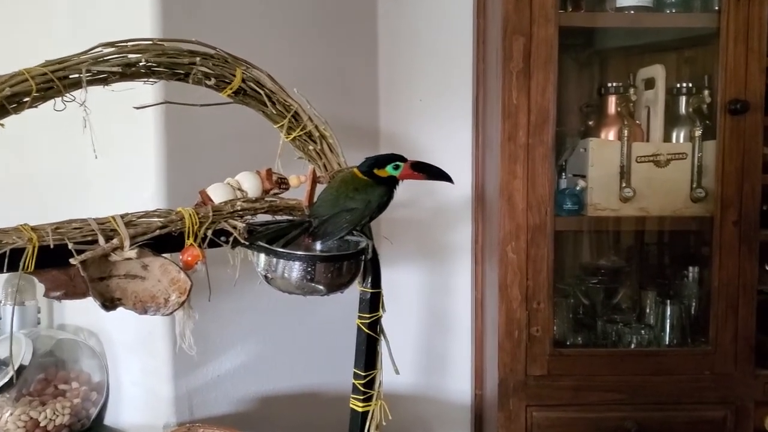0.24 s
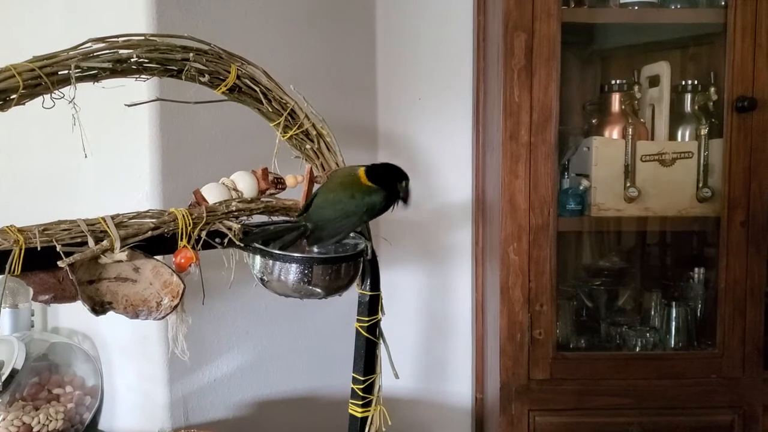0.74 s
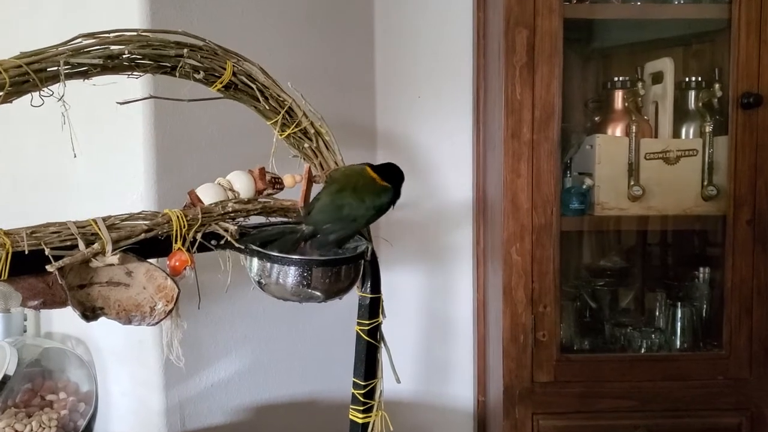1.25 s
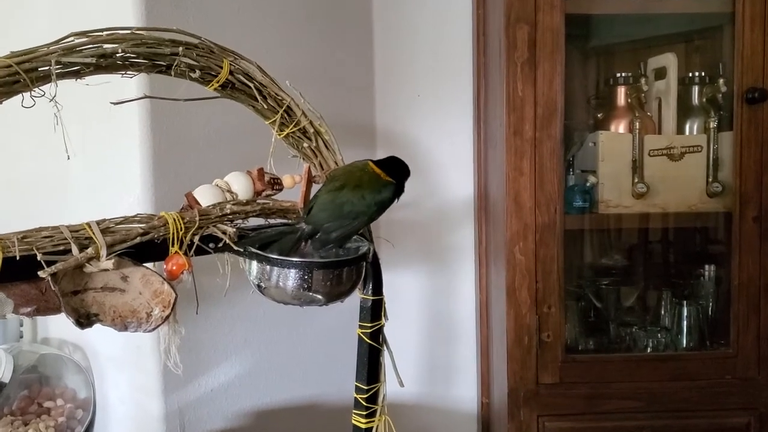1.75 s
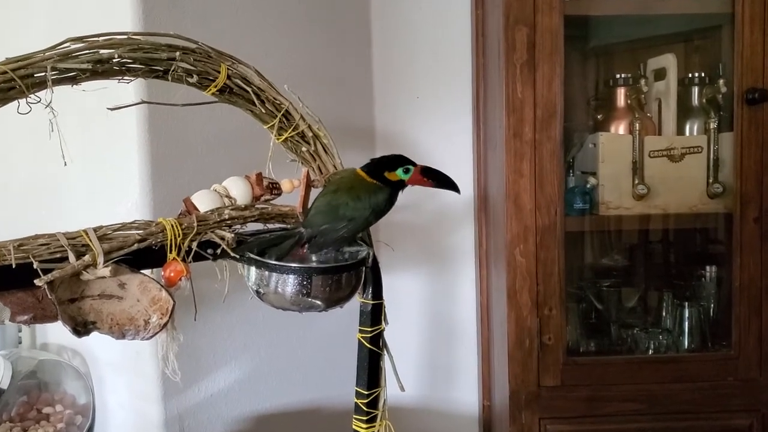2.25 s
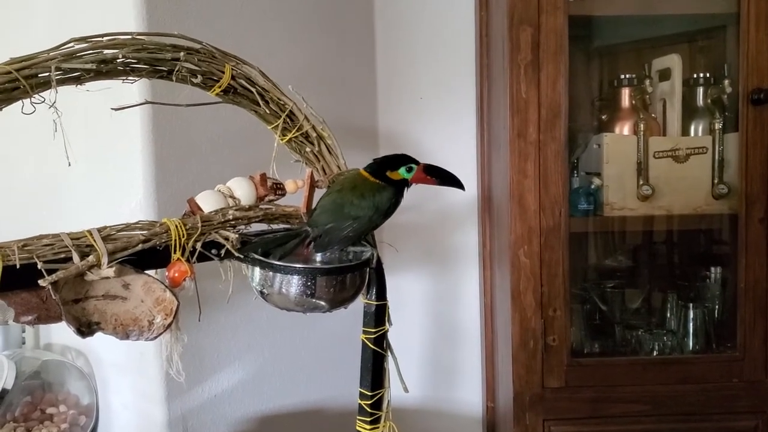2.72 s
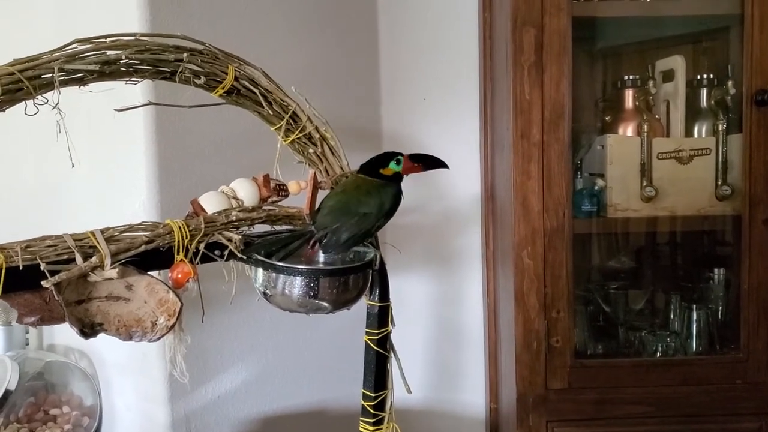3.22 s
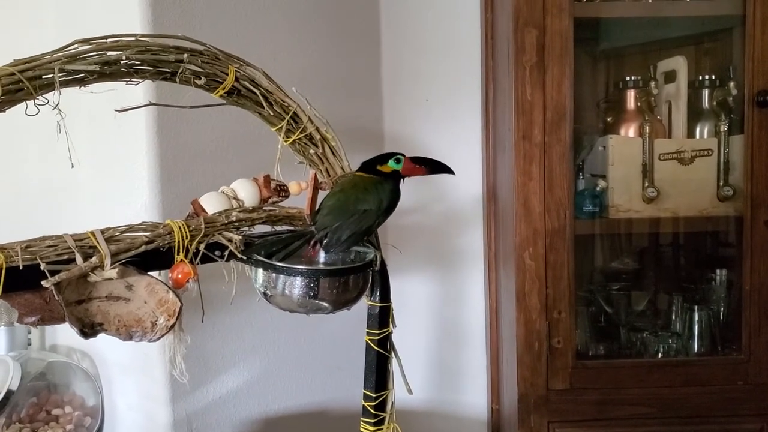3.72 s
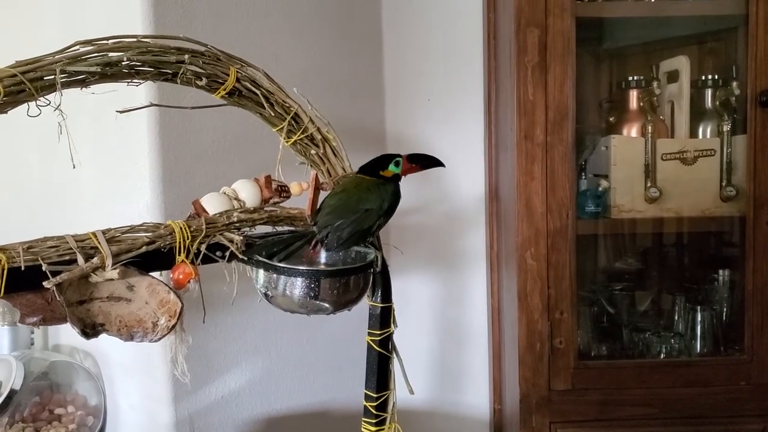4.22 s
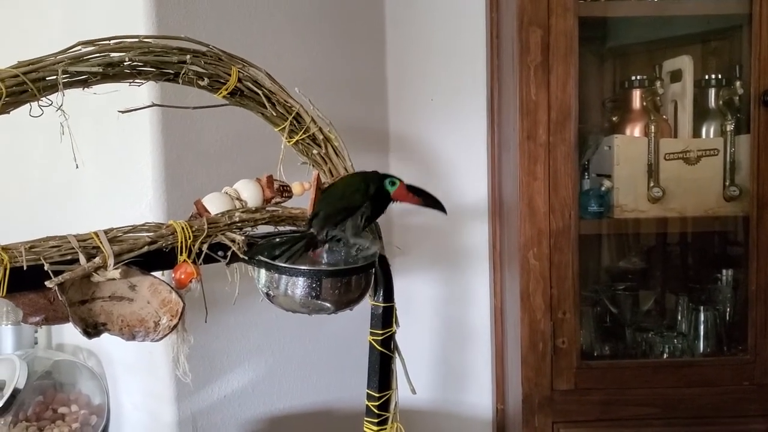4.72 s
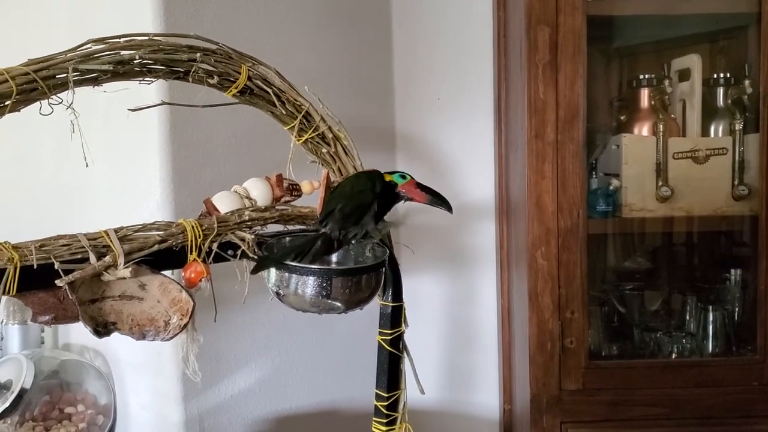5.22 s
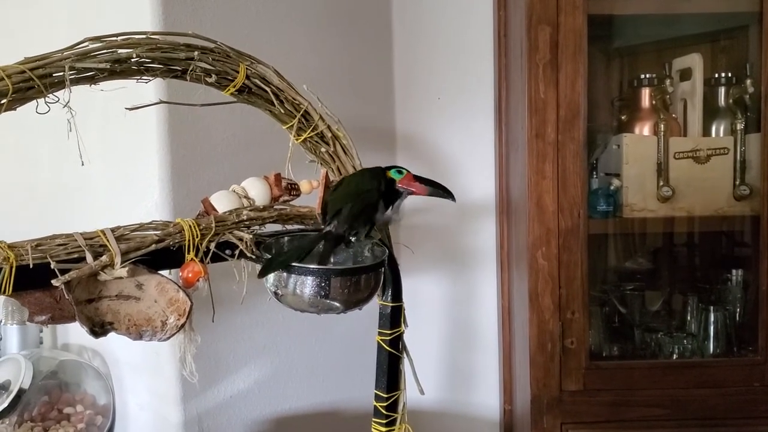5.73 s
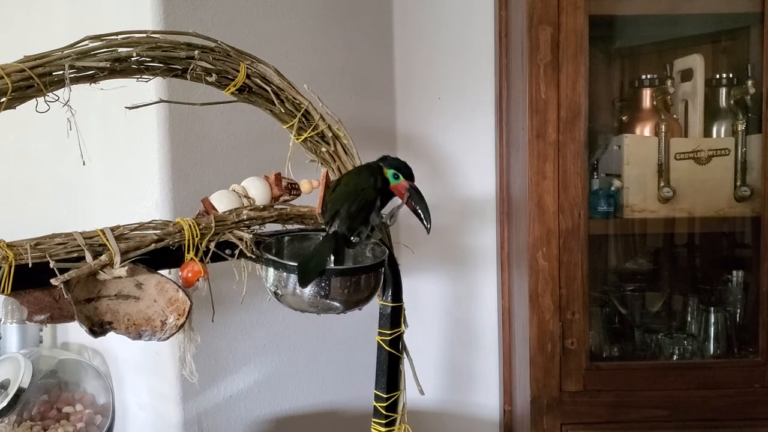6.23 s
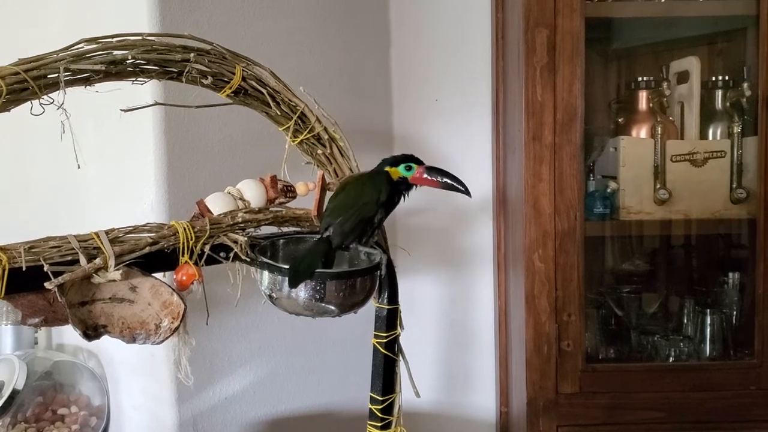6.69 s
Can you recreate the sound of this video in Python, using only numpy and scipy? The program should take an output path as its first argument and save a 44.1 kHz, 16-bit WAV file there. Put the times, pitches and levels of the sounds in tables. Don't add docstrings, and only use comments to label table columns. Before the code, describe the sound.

Soft wet ruffling, fast fluttering slaps on shallow water, then a sudden bright splash and more fluttering in a quiet, hard-walled room.

```python
import sys
import numpy as np
from scipy import signal
from scipy.fft import rfft, irfft
from scipy.io import wavfile
from scipy.ndimage import uniform_filter1d

SR = 44100
rng = np.random.default_rng(int(sys.argv[2]) if len(sys.argv) > 2 else 0)


def put_to_file(sound):
    columns = np.atleast_2d(sound).T
    safe = np.clip(columns, -1, 1)
    whole_steps = np.round(safe * 32767)
    wavfile.write(sys.argv[1], SR, whole_steps.astype(np.int16))


def volts(x):
    e = np.asarray(x, float) / 20
    return 10 ** e


N = 306740

# t/s, near level/dB, depth/0-1, far lag/ms, far level/dB
FIRST_SHIVER = [(1.4302, -34, 0.71, 13, -44), (1.483, -37, 0.1, 18, -48), (1.537, -35.5, 0.35, 17, -40),
                (1.5913, -36.5, 0.43, 16.7, -37), (1.646, -40.5, 0.73, 14, -50),
                (1.7015, -32.5, 0.56, 14, -34), (1.7557, -35.5, 0.83, 15, -35.5),
                (1.813, -31.5, 0.68, 12, -39), (1.8666, -39, .6, 17.3, -37), (1.922, -34, .4, 18, -44),
                (1.9805, -34.5, 0.56, 16, -46), (2.0377, -38, 0.8, 20.3, -34.5)]
SECOND_SHIVER = [(4.888, -27.5, .3, 10, -44), (4.9415, -31, .5, 10, -46), (5.3, -33, 0.33, 18, -39.5),
                 (5.351, -39, .25, 19, -35.5), (5.4069, -35, 0.21, 16, -36), (5.453, -31, 0.38, 20, -37),
                 (5.5074, -33, 0.41, 18, -40), (5.561, -34.5, 0.59, 15, -46), (5.614, -35, 0.46, 14, -42.5),
                 (5.659, -41, .3, 16, -36), (5.71, -28, 0.52, 3, -35.5), (5.7619, -34, 0.36, 16, -34),
                 (5.824, -44, .1, 15, -54.5), (5.887, -46, 0.11, 7.7, -55.5)]
THIRD_SHIVER = [
    (5.9445, -41, .2, 25.3, -37),
    (6.0036, -33, 0.47, 15, -39),
    (6.0585, -34, 0.37, 22.8, -37.5),
    (6.1189, -23.5, 0.22, 23.5, -28.5),
    (6.1707, -37, 0.33, 28.7, -32),
    (6.233, -45, .1, 11, -40),
    (6.3085, -39, 0.69, 22, -46),
    (6.362, -46, 0.32, 5.4, -42),
    (6.4185, -40.5, .4, 7, -42.5),
]
# t/s, level/dB, depth/0-1
DUNKS = [
    (5.7704, -35.5, 0.75),
    (5.9532, -43, 0),
    (6.0119, -37, 0.56),
    (6.1819, -28.5, 0.58),
    (6.375, -43, 0.76),
]
# t/s, level/dB, depth/0-1
FLICKS = [
    (2.052, -33.5, 0),
    (2.103, -45, .2),
    (4.8258, -24.5, .0),
    (4.88, -30, .2),
    (4.8835, -33, .2),
    (4.9317, -36, .2),
    (5.46, -39, 0.4),
    (5.665, -44, 0.3),
    (5.948, -36.5, 0.06),
]
# f/Hz, level/dB per Hz
SLAP_COLOUR = [(590, -44), (1000, -22), (1220, -6.5), (1370, -5), (1860, -0.5), (2560, -8), (3810, -5),
               (4990, -17.5), (6020, -4.5), (7700, -3), (8860, -3), (15000, -10.5), (16500, -23)]
# level at surface/dB, change at full depth/dB
SLAP_SKIM, SLAP_DEEP = (-30.5, -14.5, -10.5), (27.7, 8, -3.5)
FAR_SKIM, FAR_DEEP = (-32.5, -22, -9), (35, 16, -2)
# t/s, level/dB, depth/0-1
SWEEPS = [(0.84, -43, 0.53), (0.8517, -42.5, .0), (0.858, -39.5, 0.08), (0.895, -39, 0.38),
          (0.9035, -32, 0.44), (0.9566, -36, .75), (0.983, -33.5, 0.93), (1.016, -39, 0.6),
          (1.028, -44, .55), (1.0605, -38.5, 0.8), (1.116, -35.5, 0.8), (1.1794, -48, 0.5),
          (1.2264, -42, 0.74), (1.2644, -46, .6), (1.28, -46, 0.5), (1.311, -39, 0.72), (3.324, -56.5, 0),
          (3.339, -49.5, 0.57), (3.453, -54.5, .1), (3.4794, -59, .1)]
# f/Hz, level/dB per Hz
SWEEP_COLOUR = [(590, -49), (1000, -24), (1290, -15), (1910, -11.5), (3120, -3.5), (3470, 1.5),
                (7260, -9.5), (13000, -7.5), (15900, -8), (16500, -34)]
# level at surface/dB, change at full depth/dB
SWEEP_SKIM, SWEEP_DEEP = (-32, -19, -3), (24.3, 18.1, -12)
# t/s, level/dB, depth/0-1, length/ms
FLICKED_DROPS = [
    (2.2493, -38.5, 0.03, 13),
    (3.1405, -34.5, .0, 10.3),
    (4.1083, -18, 0.14, 6.5),
    (6.744, -37, 0.78, 6.6),
    (6.765, -35.5, 0.84, 7),
]
# f/Hz, level/dB per Hz
DROP_COLOUR = [(590, -61), (1000, -36), (2470, -32.5), (3230, -14), (3760, -19.5), (4990, -16), (5610, -27),
               (6090, -10), (8260, 0.5), (10800, -4.5), (11900, 1), (15400, -3.5), (16500, -23)]
# level at surface/dB, change at full depth/dB
DROP_SKIM, DROP_DEEP = (-41, -24.5, -8.5), (12, 11, 3)
# f/Hz, level re drop/dB
RIM_RINGS = [(8300, -15.5), (6390, -27)]
# t/s, force/dB, cavity resonance factor
SPLASH = [
    (4.955, -58, .85),
    (4.971, -35, 0.73),
    (4.989, -20, 0.76),
    (4.999, -15, 0.88),
    (5.038, -19.5, 1.24),
    (5.069, -19.5, 0.95),
    (5.098, -26.5, 1.01),
    (5.13, -32.5, 1.06),
    (5.17, -36, 1.03),
]
# f/Hz, level/dB per Hz
SPLASH_COLOUR = [(350, -72.5), (600, -48), (1230, -18), (1340, -20), (1400, -15), (2570, -11.5),
                 (2840, -4.5), (3690, -14), (4940, -7.5), (5910, -11.5), (12500, -18), (15800, -32),
                 (16500, -44)]
# f/Hz, width/Hz, level/dB
CAVITY = [(2070, 160, -10.5), (2878, 470, 6), (4890, 420, 11.5), (6200, 600., -18)]
# t/s, vigour/dB, depth/0-1
SPRAY = [
    [(0.83, -63, .2), (0.898, -56, 0.07), (0.962, -48, 0.5), (1.04, -53.5, 0.47), (1.16, -61.5, 0.67),
     (1.4, -56.5, 0.25), (1.846, -57.5, 0.4), (1.96, -56, 0.28), (2.12, -61, .3)],
    [(4.82, -68, 0.43), (4.96, -47, 0.47)],
    [(5.2, -61, 0.25), (5.464, -61.5, 0), (5.646, -62.5, 0.1), (5.782, -69, 0.73), (5.86, -69, 0.06)],
    [(5.93, -71, 0.53), (6.016, -58.5, 0.17), (6.14, -58.5, 0.32), (6.196, -50, 0.1), (6.276, -55, 0.2),
     (6.41, -58, .0), (6.46, -80.5, 0.57)],
]
# f/Hz, level/dB per Hz
SPRAY_COLOUR = [(1000, -20.5), (1500, -4), (2600, -4.5), (4000, -3.5), (5500, -7), (7500, -7), (9200, -5),
                (12000, -8.5), (15800, -7), (16500, -25.)]
# t/s, level/dB, start f/Hz, rise factor, length/s
PLOPS = [(0.887, -61.5, 1480, 1.05, 0.04), (0.978, -38, 3680, 0.97, 0.0056),
         (1.115, -40.5, 3500, 0.86, 0.0092), (1.113, -48.5, 1920, 1.12, 0.017),
         (3.316, -61.5, 550, 1.03, .06), (3.321, -57, 1530, 1, 0.04), (4.085, -62.5, 8500, 0.99, .03),
         (4.958, -37.5, 1903, 1.32, .035), (4.964, -48.5, 453, 2.03, 0.042), (4.989, -44, 607, 2.4, 0.052),
         (3.452, -69, 5700, 1.02, 0.011), (5.712, -46.5, 2890, 1.1, 0.0057),
         (6.668, -71, 2510, 1.12, 0.062)]
# f/Hz, t60/s
ROOM = [(500, 0.41), (1500, 0.41), (4000, 0.54), (8000, 0.4), (12000, 0.28), (16000, 0.28)]
# left t/ms, left level/dB, right t/ms, right level/dB
ECHOES = [(4.6, -6, 5.2, -13), (8.4, -10, 8.3, -11.5), (12.5, -18.5, 13.3, -20)]
# f/Hz, level/dB per Hz
HUM = [(12, -44), (20, -14), (59, 3.5), (74, -8), (86, -17), (113, -8), (141, -14), (176, -10), (280, -15),
       (498, -20.5), (776, -21.5), (4000, -39.5), (5200, -76), (8800, -120)]
# f/Hz, left-right likeness/0-1
HUM_SAME = [(60, 0.99), (250, 0.88), (640, 0.3), (1400, 0), (15000, .0)]
# f/Hz, width/Hz, level/dB
DRONES = [(57., 4.7, -69), (118.3, 8.9, -71), (195.8, 3.1, -72.5), (237, 12, -74.5), (281, 10., -77.5)]
# f/Hz, level/dB per Hz
HISS = [(2350, -35.5), (4000, -5.5), (6060, -8), (9120, -11.5), (15200, 1), (16100, -11.5), (16500, -27)]
# f/Hz, level/dB
PORTS = [(60, -1.5), (120, -0.5), (240, -1), (480, -1), (950, -2), (1890, 2), (3770, 0.5), (7520, 0.5),
         (15000, 3)]

FAR_DEPTH, SLAP_MS, SWEEP_MS = 0.76, 0.9, 3.6
CHURN_SKIM_DB, CHURN_DEEP_DB = -15.0, 31.5
DRAIN_S, DRAIN_DB, DRAIN_DB_PER_S = 5.198, -40, 99
SETTLE_DB, SETTLE_S = -7.5, 0.04
PLOP_WIDTH_HZ, PLOP_WIDTH_SHARE, RIM_RING_S = 270, 0.028, 0.01
LAG_SAMPLES = 18
HUM_DB, HISS_DB = -57.5, -78.5


def wingbeats():
    beats = FIRST_SHIVER + SECOND_SHIVER + THIRD_SHIVER
    near = [(s, db, depth) for s, db, depth, lag_ms, far_db in beats] + DUNKS
    far = [(s + lag_ms / 1000, far_db, FAR_DEPTH * depth) for s, db, depth, lag_ms, far_db in beats]
    far = far + FLICKS
    near_slaps = contacts([(*row, SLAP_MS) for row in near], SLAP_SKIM, SLAP_DEEP)
    far_slaps = contacts([(*row, SLAP_MS) for row in far], FAR_SKIM, FAR_DEEP)
    rows = near_slaps + far_slaps
    return bursts(rows, SLAP_COLOUR, split_hz=5240, trim_db=7.5, dull_db=-1, snap=4.25, late_ms=0.87)


def plumage_sweeps():
    rows = contacts([(*row, SWEEP_MS) for row in SWEEPS], SWEEP_SKIM, SWEEP_DEEP)
    return bursts(rows, SWEEP_COLOUR, split_hz=6700, trim_db=3, dull_db=-0.5, snap=0.86, late_ms=0.28)


def flicked_drops():
    rows = contacts(FLICKED_DROPS, DROP_SKIM, DROP_DEEP)
    return bursts(rows, DROP_COLOUR, split_hz=6530, trim_db=6, dull_db=3.5, snap=0.69, late_ms=0.1)


def contacts(rows, skim, deep):
    return [(s, db, *(np.array(skim) + depth * np.array(deep)), ms) for s, db, depth, ms in rows]


def bursts(rows, colour, split_hz, trim_db, dull_db, snap, late_ms):
    size = 2000
    puffs, snaps = np.zeros((2, 3, N + size))
    ms = np.arange(size) * 1000 / SR
    for s, peak_db, low_db, mid_db, high_db, length_ms in rows:
        band_db = np.array([[low_db + dull_db], [mid_db + dull_db], [high_db]])
        strength = volts(peak_db + trim_db + band_db)
        at = round((s + late_ms / 1000) * SR)
        puffs[:, at:at + size] += strength * (1 - np.exp(-ms / 0.14)) * np.exp(-ms / max(length_ms, 0.2))
        snaps[:, at] += snap * strength[:, 0]
    snaps[2] *= 0.25
    drive = (puffs * rng.standard_normal(N + size) + snaps)[:, :N]
    bands = [(1300, 2900), (2900, split_hz), (split_hz, 20000)]
    return sum(signal.oaconvolve(row, causal(colour, *band))[:N] for row, band in zip(drive, bands))


def splash():
    s, force_db, size = np.transpose(SPLASH)
    t = np.arange(s[0], s[-1], 1 / SR)
    sputter = volts(4.3 * evened(uniform_filter1d(rng.standard_normal(len(t)), 90)))
    gush = evened(sputter * rng.standard_normal(len(t)))
    wide = signal.oaconvolve(gush, causal(SPLASH_COLOUR, 910, 20000))[:len(t)]
    factor = np.interp(t, s, size)
    pocket = sum(volts(db) * evened(resonate(wide, hz * factor, width)) for hz, width, db in CAVITY)
    out = np.zeros(N)
    at = round(s[0] * SR)
    out[at:at + len(t)] = volts(np.interp(t, s, force_db)) * evened(wide + 0.15 * pocket)
    return out


def spray():
    t = np.arange(N) / SR
    dull, bright = np.zeros((2, N))
    for bout in SPRAY:
        s, vigour_db, depth = np.transpose(bout)
        churn_db = vigour_db + CHURN_SKIM_DB + CHURN_DEEP_DB * depth
        dull += volts(np.interp(t, s, churn_db, left=-200, right=-200))
        bright += volts(np.interp(t, s, vigour_db, left=-200, right=-200))
    fresh = settling(t)
    drain = (t > DRAIN_S) * volts(DRAIN_DB - DRAIN_DB_PER_S * abs(t - DRAIN_S))
    dull = dull * fresh + drain
    bright = bright * fresh
    out = np.zeros(N)
    for level, band, per_s in [(dull, (1200, 8800), 830), (bright, (7000, 28000), 6900)]:
        size = volts(7.3 * np.minimum(rng.exponential(1, N), 3.5)) * rng.choice([-1.0, 1.0], N)
        hits = evened(size * (rng.random(N) < per_s / SR))
        out += signal.oaconvolve(volts(-3) * level * hits, causal(SPRAY_COLOUR, *band))[:N]
    return out


def settling(t):
    beats = np.array([row[0] for row in FIRST_SHIVER + SECOND_SHIVER + THIRD_SHIVER])
    last = np.searchsorted(beats, t) - 1
    since = np.where(last < 0, 0, t - beats[last])
    return volts(SETTLE_DB * (np.minimum(since / SETTLE_S, 1) - 0.5) * (last >= 0))


def plops():
    out = np.zeros(N)
    rim = [(row[0], row[1] + db, hz, 1, RIM_RING_S) for row in FLICKED_DROPS for hz, db in RIM_RINGS]
    for s, level_db, start_hz, rise, length_s in PLOPS + rim:
        hz = np.linspace(start_hz, start_hz * rise, round(length_s * SR))
        width = PLOP_WIDTH_HZ + PLOP_WIDTH_SHARE * start_hz
        puff = rng.standard_normal(len(hz))
        ring = evened(resonate(resonate(puff, hz, width), hz, width))
        at = round(s * SR)
        out[at:at + len(hz)] += volts(level_db) * ring * signal.windows.tukey(len(hz), 0.6)
    return out


def evened(x):
    return x / np.sqrt(np.mean(x ** 2) + 1e-20)


def read(points, hz):
    f, value = np.transpose(points)
    return np.interp(np.log(hz + 1), np.log(f + 1), value)


def causal(colour, lo_hz, hi_hz):
    hz = abs(np.fft.fftfreq(2048, 1 / SR)) + 1
    edges = np.sqrt((1 + (lo_hz / hz) ** 8) * (1 + (hz / hi_hz) ** 8))
    log_gain = np.log(np.maximum(volts(read(colour, hz)) / edges, 1e-5))
    taps = np.fft.ifft(np.exp(np.conj(signal.hilbert(log_gain)))).real[:1024]
    return taps / np.linalg.norm(taps)


def resonate(x, hz, width):
    turn = np.exp(2j * np.pi * np.cumsum(hz * np.ones(len(x))) / SR)
    r = np.exp(-np.pi * width / SR)
    return 2 * (turn * signal.lfilter([1 - r], [1, -r], x / turn)).real


def placed(x, lag, tail_db):
    return np.array([x, np.roll(x, lag)]) + room(x, tail_db)


def room(x, tail_db):
    taps = np.zeros((2, SR))
    at = np.arange(200, SR - 10, 10) + rng.integers(0, 10, (2, (SR - 201) // 10))
    np.put_along_axis(taps, at, rng.choice([-1.0, 1.0], at.shape), 1)
    hz, t, z = signal.stft(taps, SR, nperseg=256)
    decay = volts(-60 * t / read(ROOM, hz)[:, None])
    tail = signal.istft(z * decay, SR, nperseg=256)[1]
    tail = volts(tail_db) * tail / np.linalg.norm(tail[0])
    for left_ms, left_db, right_ms, right_db in ECHOES:
        tail[0, round(left_ms * SR / 1000)] += volts(left_db)
        tail[1, round(right_ms * SR / 1000)] -= volts(right_db)
    return signal.fftconvolve(x[None], tail, axes=1)[:, :N]


def hum():
    hz = np.fft.rfftfreq(N, 1 / SR)
    left, other = rfft(rng.standard_normal((2, N)))
    same = np.clip(read(HUM_SAME, hz), 0, 1)
    right = same * left + np.sqrt(1 - same ** 2) * other
    rumble = evened(irfft(np.array([left, right]) * volts(read(HUM, hz)), N))
    air = rng.standard_normal(N)
    drones = sum(volts(db) * evened(resonate(air, f, width)) for f, width, db in DRONES)
    hiss = evened(irfft(rfft(rng.standard_normal((2, N))) * volts(read(HISS, hz)), N))
    return volts(HUM_DB) * rumble + drones + volts(HISS_DB) * hiss


def scene():
    slaps = placed(wingbeats(), LAG_SAMPLES // 2, tail_db=-8)
    plumage = placed(plumage_sweeps() + spray() + plops(), LAG_SAMPLES, tail_db=-0.21)
    drops = placed(flicked_drops(), LAG_SAMPLES, tail_db=-0.72)
    gush = placed(splash(), LAG_SAMPLES, tail_db=3)
    return slaps + plumage + drops + gush + hum()


def low_pass(x):
    return signal.sosfilt(signal.butter(12, 16990, fs=SR, output="sos"), x)


def record(dry):
    hz = np.fft.rfftfreq(N, 1 / SR)
    lean = volts(read(PORTS, hz) * np.array([[0.5], [-0.5]]))
    clipped = np.clip(irfft(rfft(dry) * lean, N), -1, 1)
    edge = 1 / (1 + (hz / 16300) ** 60)
    mix = irfft(rfft(clipped) * edge, N)
    return low_pass(mix)


dry = scene()
out = record(dry)
put_to_file(out)
```